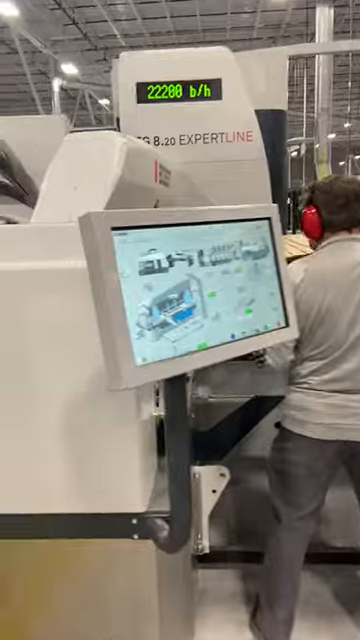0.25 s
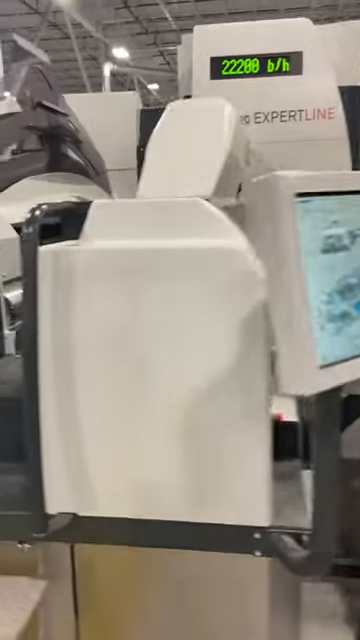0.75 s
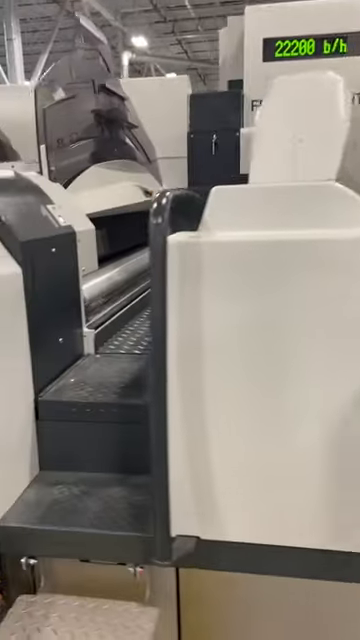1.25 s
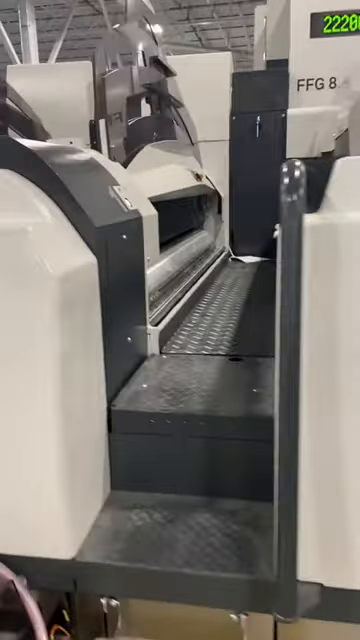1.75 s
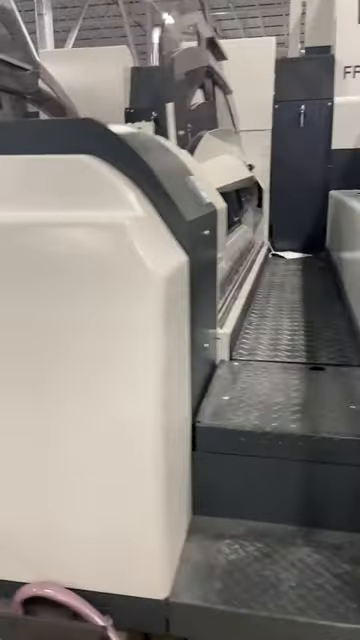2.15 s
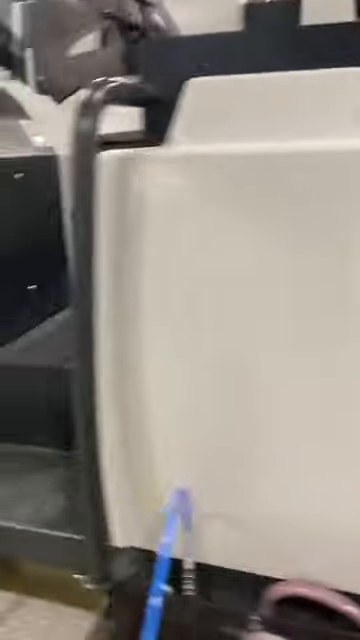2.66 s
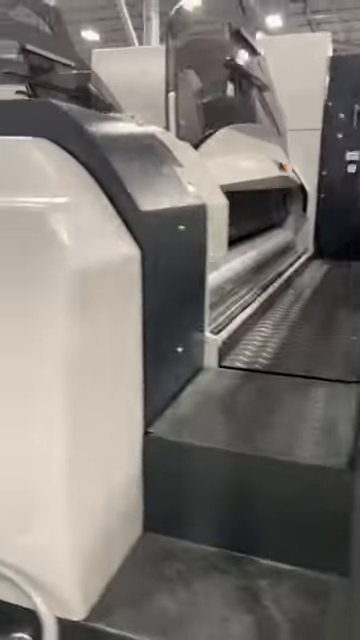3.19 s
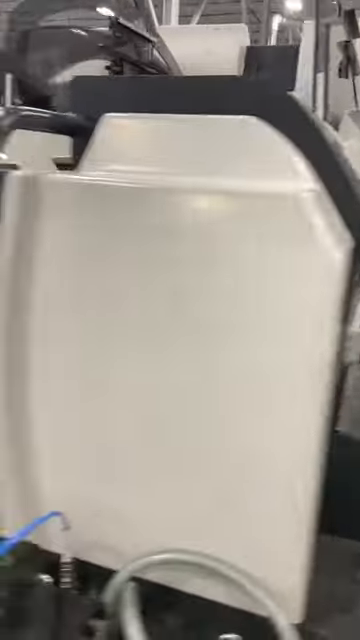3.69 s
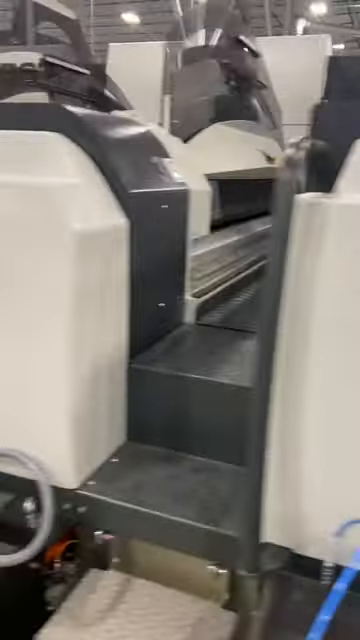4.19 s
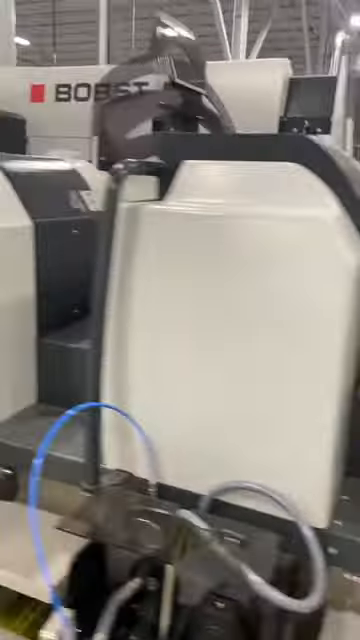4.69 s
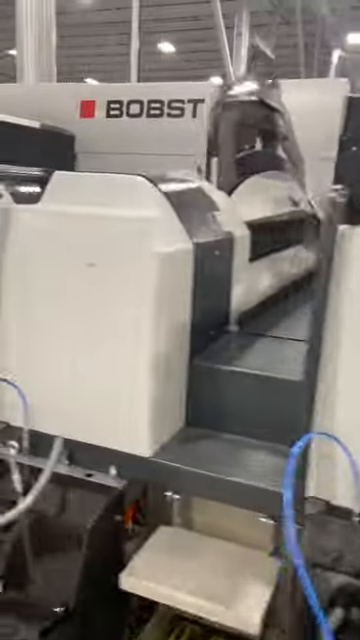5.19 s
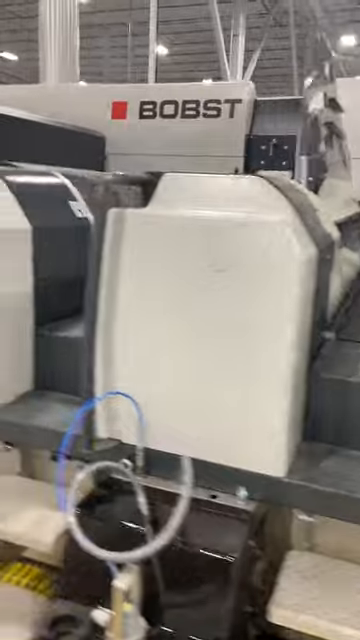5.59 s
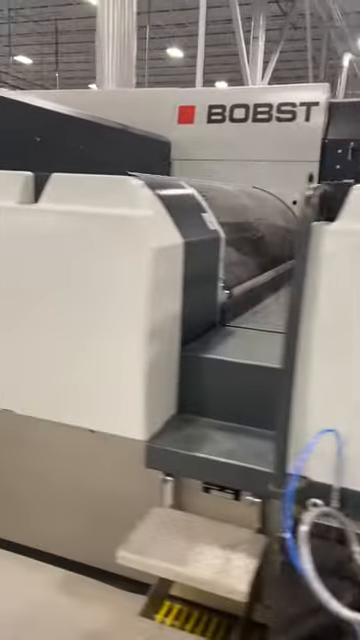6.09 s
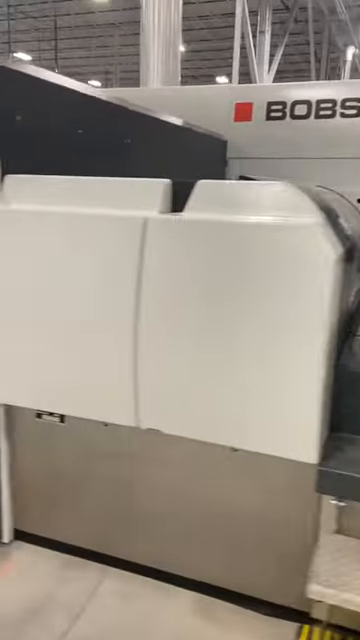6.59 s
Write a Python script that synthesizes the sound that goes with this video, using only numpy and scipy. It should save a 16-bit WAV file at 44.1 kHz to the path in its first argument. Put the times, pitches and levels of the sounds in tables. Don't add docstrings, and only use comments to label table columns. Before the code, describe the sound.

In a large factory hall, a box-folding machine runs very fast. Close at first, a sheet feeder swishes about six times a second with a nasal gear singing on each stroke. Low frames thump in the same rhythm over roller rumble, blower hiss and wavering whines. As the close stereo microphone moves along, the feeder fades and duller thumping, rumble and a small dry tick take over.

```python
import sys
import numpy as np
from scipy import signal
from scipy.fft import rfft, irfft, next_fast_len
from scipy.io import wavfile
from scipy.ndimage import uniform_filter1d

SR = 44100
rng = np.random.default_rng(int(sys.argv[2]) if len(sys.argv) > 2 else 0)


def decibels_to_gain(level_db):
    exponent = np.asarray(level_db, float) / 20
    return 10 ** exponent


def int16_out(signal):
    q = np.round(np.clip(np.atleast_2d(signal).T, -1, 1) * 32767)
    wavfile.write(sys.argv[1], SR, q.astype(np.int16))


N = 302085
SIZE = next_fast_len(N)
T = np.arange(N) / SR
SLOW_T = T[::64]
HZ = np.fft.rfftfreq(SIZE, 1 / SR)

BOXES_PER_S = 22200 / 3600
WALK_M_PER_S, SOUND_M_PER_S = 1.6, 343
FEEDER_PASSED_S, FEEDER_ASIDE_M = 0.3, 1.77
STATION_PASSED_S, STATION_ASIDE_M = 5.96, 2.3


def evened(x):
    return x / np.sqrt(np.mean(x ** 2) + 1e-20)


def read(points, hz):
    f, *columns = np.transpose(points)
    return [np.interp(np.log(hz + 1), np.log(f + 1), c) for c in columns]


def chance(magnitude):
    z = rng.standard_normal(len(HZ)) + 1j * rng.standard_normal(len(HZ))
    return evened(irfft(z * magnitude, SIZE)[:N])


def drift(hz):
    z = rfft(rng.standard_normal(SIZE // 32))
    slow = irfft(z * np.exp(-(HZ[:len(z)] / hz) ** 2))
    slow_s = np.linspace(0, SIZE / SR, len(slow))
    return evened(np.interp(T, slow_s, slow - slow.mean()))


def patches(hz, t, bins, frames):
    z = rng.standard_normal((len(hz), len(t)))
    across_hz = uniform_filter1d(z, size=bins, axis=0)
    return evened(uniform_filter1d(across_hz, size=frames, axis=1))


def shaped(x, field):
    hz, t, z = signal.stft(x, SR, nperseg=512, noverlap=384)
    return signal.istft(z * field(hz[:, None], t), SR, nperseg=512, noverlap=384)[1][:N]


def machine_noise(colour, repeating=0., blur=.003):
    off_order_hz = abs((HZ / BOXES_PER_S + .5) % 1 - .5) * BOXES_PER_S
    teeth = np.exp(-.5 * (off_order_hz / (blur * HZ + 0.039)) ** 2)
    teeth /= uniform_filter1d(teeth, size=round(BOXES_PER_S * SIZE / SR)) + 1e-9
    share = np.clip(repeating, 0, 1)
    return chance(np.sqrt(share * teeth + 1 - share) * decibels_to_gain(read(colour, HZ)[0]))


def whistle(hz, width_hz):
    return chance(1 / (1 + (2 * (HZ - hz) / width_hz) ** 2))


def tone(hz, waver_hz, rough):
    turns = np.cumsum(hz + waver_hz * drift(2.864)) / SR
    return evened(np.cos(2 * np.pi * turns) + rough * whistle(np.mean(hz), 24))


def cycle_cosine(t, middle_ms):
    return np.cos(2 * np.pi * BOXES_PER_S * (t - middle_ms / 1000))


def once_a_box(t, peak_ms, sharpness):
    return np.exp(sharpness * (cycle_cosine(t, peak_ms) - 1))


def half_a_box(t, middle_ms, sharpness):
    return .5 + .5 * np.tanh(.5 * sharpness * cycle_cosine(t, middle_ms))


def farther(t, passed_s, aside_m):
    ratio = np.hypot(1, WALK_M_PER_S * (t - passed_s) / aside_m)
    return ratio, (ratio - 1) * aside_m


def spot(t, s, db, reach_s):
    return decibels_to_gain(db) / (1 + ((t - s) / reach_s) ** 2)


def loud_places(steady_gain, rows):
    return steady_gain + np.interp(T, SLOW_T, sum(spot(SLOW_T, *row) for row in rows))


# centre_s, extra_db
HARD_SHEET_ROWS = [
    (.07, .6),
    (.72, 2),
    (1.04, 2.5),
    (2.18, 5.5),
    (2.5, 5.5),
    (2.99, 4.5),
    (3.64, 3.5),
]


def hard_sheet_db(t):
    return sum(db * np.exp(-.5 * ((t - s) / .07) ** 2) for s, db in HARD_SHEET_ROWS)


# frequency_hz, density_db (per Hz)
SWISH_COLOUR = [(150, -22), (260, -2), (400, -1.5), (600, -2), (800, -11.5), (1100, -7), (1500, -12.5),
                (2500, -22), (4000, -26.5), (6000, -25), (8000, -30), (12000, -36), (15600, -39),
                (16000, -99)]
# frequency_hz, middle_ms (in the cycle), sharpness
SWISH_STROKE = [(250, 83, 1.3), (580, 93, 2.8), (1080, 75, 0.4), (2500, 84, 4.1), (5000, 72, 3.5),
                (10000, 35, 2)]


def sheet_swish(ratio, metres, travel_ms):
    def stroke(hz, t):
        middle_ms, sharpness = read(SWISH_STROKE, hz)
        tilt_db = 0.31 - .5 * np.interp(t, T, metres) - 0.36 * hard_sheet_db(t)
        tilt_db = tilt_db - 0.8 / (1 + np.exp((2.2 - t) / .2))
        rattle_db = 1.66 * patches(hz, t, 12, 6)
        pull = half_a_box(t, middle_ms + np.interp(t, T, travel_ms), sharpness)
        return pull * decibels_to_gain(tilt_db * np.log2(1 + hz / 1000) + rattle_db)

    level_db = -19 + np.interp(T, SLOW_T, hard_sheet_db(SLOW_T)) + 1.64 * drift(52)
    gain = decibels_to_gain(level_db) / ratio ** 0.48
    return gain * shaped(machine_noise(SWISH_COLOUR, repeating=0.87, blur=0.0021), stroke)


# centre_s, peak_db, reach_s
MESH_ANTINODES = [
    (.07, -22, 0.11),
    (.93, -25, 0.14),
    (1.07, -25, .05),
    (1.24, -20, .06),
    (1.72, -21, .07),
    (1.89, -22.5, 0.087),
    (2.02, -22, .08),
    (2.99, -29, 0.091),
    (3.55, -26.5, 0.13),
    (5.25, -29, .2),
]
# centre_s, peak_db, reach_s
OCTAVE_ANTINODES = [
    (.4, -27.5, 0.22),
    (1.04, -36, .08),
    (1.37, -37, .08),
    (2.02, -39, .08),
    (2.83, -38, 0.096),
]


def feed_gears(ratio, travel_ms):
    mesh_hz = 560
    mesh_gain = loud_places(decibels_to_gain(-33.5) / ratio ** 0.7, MESH_ANTINODES)
    octave_gain = loud_places(decibels_to_gain(-30) / ratio ** 0.83, OCTAVE_ANTINODES)
    mesh = mesh_gain * tone(mesh_hz, 3.376, 0.45) * half_a_box(T, 92 + travel_ms, 1.8)
    octave = decibels_to_gain(-3.0) * tone(2 * mesh_hz, 11.93, 0.85) * half_a_box(T, 75 + travel_ms, 3.5)
    into_ms = (T - travel_ms / 1000) * BOXES_PER_S % 1 / BOXES_PER_S * 1000
    rising_hz = 820 + 320 * np.clip((into_ms - 22) / 45, 0, 1)
    grip = decibels_to_gain(-0.4) * tone(rising_hz, 14.85, 0) * once_a_box(T, 48 + travel_ms, 3.7)
    return mesh + octave_gain * (octave + grip)


def feeder():
    ratio, metres = farther(T, FEEDER_PASSED_S, FEEDER_ASIDE_M)
    travel_ms = 1000 * metres / SOUND_M_PER_S
    return sheet_swish(ratio, metres, travel_ms) + feed_gears(ratio, travel_ms)


# centre_s, peak_db, reach_s, peak_ms (in the cycle)
LOW_FRAME_ROWS = [
    ((8, 0.51), [(2, -27, 3.6, 66), (5.2, -30, 1.2, 88)]),
    ((11, 3.3), [(0, -14.5, 1, 106), (1.8, -18.5, 0.7, 84), (3, -16, 0.36, 110), (6.1, -14.5, 0.84, 98)]),
    ((12, 1.7), [(4.2, -12, 0.14, 76), (6.3, -27, 0.34, 100)]),
    ((17, 3.4), [(.4, -13, 0.38, 83), (3.2, -11.5, 1, 158), (6.85, -20, 0.82, 146)]),
    ((16, 3.9), [(0, -15.5, 0.41, 12), (2.1, -21, 0.82, 46), (3.5, -14.5, 0.88, 60), (4.6, -24, 0.24, 130), (6.85, -23, 0.93, 120)]),
]
HIGH_FRAME_ROWS = [
    ((22, 1.58), [(0, -14.5, 0.75, 122), (2.2, -10.5, 0.98, 112.3), (4.1, -14.5, 1, 84.5), (5.8, -24, 0.73, 95)]),
    ((22, 6.5), [(4.6, -19.5, 0.93, 161), (6.1, -15, .9, 157.1)]),
    ((38.3, 4.9), [(.45, -19, .6, 80.6), (1.3, -20.5, 0.26, 133), (2.8, -21, 0.36, 101), (4.2, -24, 1.4, 115)]),
    ((26, 4.6), [(0, -14, 0.51, 127), (2.3, -18, 0.75, 119.4), (5.8, -48, 1.5, 118)]),
    ((30, 6.9), [(.4, -13.5, 0.8, 97), (3.1, -16, 0.44, 141.6), (4.55, -18, 0.38, 127)]),
]


def thumps():
    out = np.zeros(N)
    for (order, sharpness), places in LOW_FRAME_ROWS + HIGH_FRAME_ROWS:
        beat = sum(spot(SLOW_T, s, db, reach_s) * once_a_box(SLOW_T, peak_ms, sharpness)
                   for s, db, reach_s, peak_ms in places)
        turns = order * BOXES_PER_S * T + rng.random() + 0.094 * drift(0.61)
        out += decibels_to_gain(0.17 * drift(2.0)) * np.interp(T, SLOW_T, beat) * np.cos(2 * np.pi * turns)
    return out


# centre_s, peak_db, reach_s
HUM_ROWS = [
    (13, [(.4, -21, 0.66), (1.8, -23, 0.26)]),
    (22, [(4.8, -25, 0.82)]),
    (30, [(3.3, -25.5, 0.38)]),
    (38, [(2.9, -30, 0.4), (5, -27.5, 0.36)]),
]


def hums():
    out = np.zeros(N)
    for order, rows in HUM_ROWS:
        turns = order * BOXES_PER_S * T + 0.11 * drift(1.3)
        out += loud_places(0, rows) * decibels_to_gain(3.5 * drift(9.1)) * np.cos(2 * np.pi * turns)
    return out


# frequency_hz, density_db (per Hz)
TICK_SPECTRUM = [(900, -32), (1600, -3), (3000, 5), (5000, -4), (9000, -10), (15600, -24), (16000, -80)]


def tick():
    near = farther(T, STATION_PASSED_S, STATION_ASIDE_M)[0] ** -0.96
    level = near * decibels_to_gain(-34.5 + 1.8 * drift(3.1))
    return level * once_a_box(T, 36.7, 8.3) * machine_noise(TICK_SPECTRUM)


# frequency_hz, density_db (per Hz)
RUMBLE_COLOUR = [(22, -27), (45, -8), (70, -4.5), (140, -3), (200, -7.5), (280, -9), (400, -14), (560, -12),
                 (750, -18), (1100, -33.5), (1800, -47.5), (3000, -76)]


def rollers():
    return decibels_to_gain(-18.5) * machine_noise(RUMBLE_COLOUR, repeating=0.59, blur=0.0023)


# frequency_hz, density_db (per Hz)
HISS_COLOUR = [(300, -55), (700, -0.5), (1000, 0), (1400, -3.5), (1900, -4.5), (2400, -5.5), (3400, -10.5),
               (5600, -16.5), (7500, -22.5), (10000, -25.5), (13000, -33.5), (15600, -34.5), (16000, -92)]


def blowers():
    def near_feeder(t):
        return 1 / farther(t, FEEDER_PASSED_S, FEEDER_ASIDE_M)[0]

    def air(hz, t):
        near_station = 1 / farther(t, STATION_PASSED_S, STATION_ASIDE_M)[0]
        bright_db = -3 + 5 * near_feeder(t) + 6 * near_station
        gusts_db = 3.3 * (hz / 15000) ** 4 * patches(hz, t, 60, 50)
        return decibels_to_gain(bright_db * np.clip(hz / 8000, 0, 2) + 1.32 * patches(hz, t, 8, 24) + gusts_db)

    level_db = -30.5 + 1.7 * near_feeder(T) + .5 * drift(40) + 0.38 * drift(150)
    return decibels_to_gain(level_db) * shaped(machine_noise(HISS_COLOUR), air)


# pitch_hz, width_hz, start_db, middle_db, end_db (of the walk)
FAINT_WHINES = [(1240, 10, -48, -44, -41), (3672, 22, -50, -52, -54), (1599, 10, -58, -50, -58),
                (2328, 12, -60, -58, -52), (2690, 10, -52, -53, -53), (4004, 25, -60, -60, -60),
                (4615, 30, -57, -62, -62), (4968, 40, -62, -60, -59)]
STRONG_PITCHES = (920.5, 2484, 3198, 3722)
# centre_s, peak_db, reach_s
STRONG_ANTINODES = [
    (-50, [(.09, -27, .1), (.39, -34, 0.053), (1., -30.5, 0.23), (1.52, -29, .1), (1.88, -29, .07), (2.56, -28, 0.065), (3.2, -33, 0.19), (4.95, -40, 0.19), (5.6, -31, 0.43), (6.83, -27, 0.15)]),
    (-54, [(.74, -38, .06), (1.39, -31, 0.059), (1.88, -34, 0.043), (2.66, -38, 0.049), (3.2, -42, .3), (3.62, -37, .06), (4.55, -41, 0.16), (5.2, -41, 0.62), (6.76, -35.5, 0.088)]),
    (-44.5, [(.39, -40, 0.07), (2.5, -47, .08), (2.95, -44, .1), (3.85, -35, .12), (4.55, -40, 0.13), (5.1, -50.5, .3)]),
    (-53, [(.95, -39, 0.18), (1.75, -42, 0.09), (3.6, -41, .1), (4.7, -39, 0.077), (5.9, -42, 0.39)]),
]


def whines():
    out = np.zeros(N)
    for hz, width_hz, *levels_db in FAINT_WHINES:
        out += np.interp(T, [0, N / SR / 2, N / SR], decibels_to_gain(levels_db)) * whistle(hz, width_hz)
    for hz, (steady_db, rows) in zip(STRONG_PITCHES, STRONG_ANTINODES):
        out += loud_places(decibels_to_gain(steady_db), rows) * decibels_to_gain(-6.5) * tone(hz, .0015 * hz, 1.3)
    return out


# centre_s, length_s, level_db, pitch_hz, width_hz
VALVE_PUFF = (2.285, .05, -48, 14500, 7000)


def valve():
    s, length_s, db, hz, width_hz = VALVE_PUFF
    return decibels_to_gain(db) * np.exp(-((T - s) / length_s) ** 2) * whistle(hz, width_hz)


def broadband():
    return feeder() + tick() + rollers() + blowers()


def scene():
    booms = thumps() + hums()
    lines = whines() + valve()
    ahead = broadband() + lines + booms
    around = broadband() + np.roll(lines, 2600) + 0.49 * np.roll(booms, 400)
    return np.array([ahead, around])


def band_limit(x):
    return signal.sosfilt(signal.butter(12, 17110, fs=SR, output="sos"), x)


# frequency_hz, level_db
SUM_RESPONSE = [(5000, 1), (6000, -1.5), (6700, -11), (7400, -32), (7900, -12.5), (8500, -5.5), (9300, -2),
                (12000, 1), (12700, -13), (13600, -30), (14400, -5), (15200, 0)]
# frequency_hz, level_db, share (that follows the sum), lead_rad
DIFFERENCE_RESPONSE = [(40, -40, -.6, 1.1), (110, -30.5, -1.3, 0.92), (320, -17.5, -0.72, 1.1),
                       (500, -9, -0.72, 1.2), (1200, -6.5, -0.62, 1.3), (1830, -9, -0.23, 0.99),
                       (2300, -2, .5, 1.6), (4000, -5, .42, 1.74), (6000, -0.5, 0.7, 1.55),
                       (8850, -0.5, .6, 1.55), (9600, -15, .6, 1.55), (10500, -36, 0, 1.55),
                       (11700, 0, -.55, 1.55), (15000, 1, -0.56, 1.55)]
# low_hz, high_hz
SUM_NULLS = (7500, 13500)
# sum_hz, difference_hz
BAND_EDGES = (15800, 15300)


def record(dry):
    ahead, around = rfft(dry, SIZE, axis=1)
    difference_db, share, lead_rad = read(DIFFERENCE_RESPONSE, HZ)
    share = np.clip(share, -1, 1)
    flip = np.where((HZ > SUM_NULLS[0]) & (HZ < SUM_NULLS[1]), -1, 1)
    mid = ahead * flip * decibels_to_gain(read(SUM_RESPONSE, HZ)[0])
    following = share * np.exp(1j * lead_rad) * ahead
    side = decibels_to_gain(difference_db) * (following + np.sqrt(1 - share ** 2) * around)
    ports = irfft(np.array([mid + side, mid - side]), SIZE)
    ports = ports / (1 + abs(ports / .93) ** 6) ** (1 / 6)
    left, right = rfft(ports)
    mid = (left + right) / 2 * (HZ < BAND_EDGES[0])
    side = (left - right) / 2 * (HZ < BAND_EDGES[1])
    mix = irfft(np.array([mid + side, mid - side]), SIZE)[:, :N]
    return band_limit(mix)


dry = scene()
out = record(dry)
int16_out(out)
```